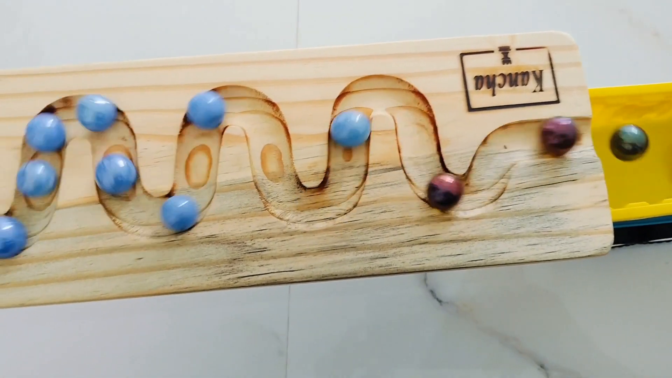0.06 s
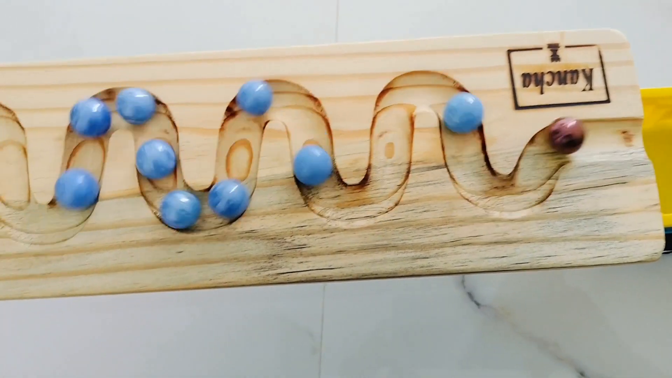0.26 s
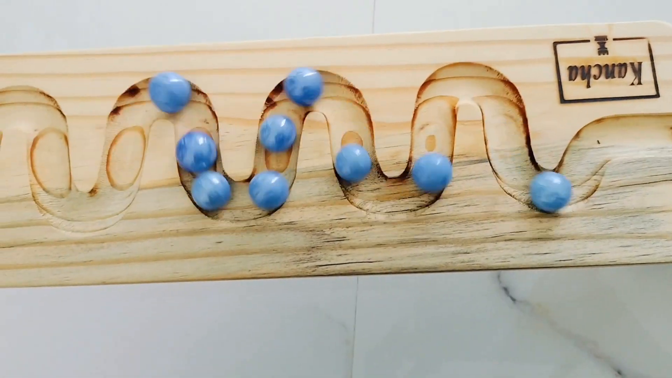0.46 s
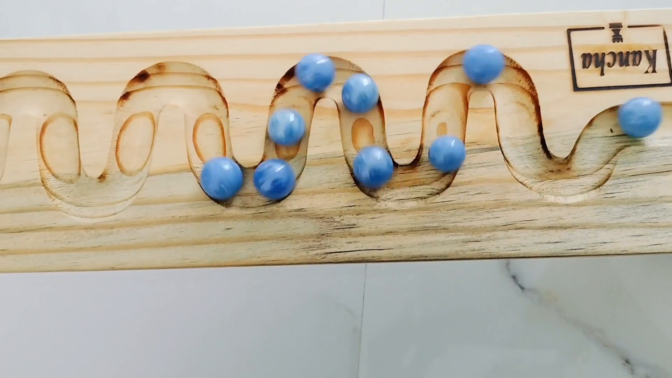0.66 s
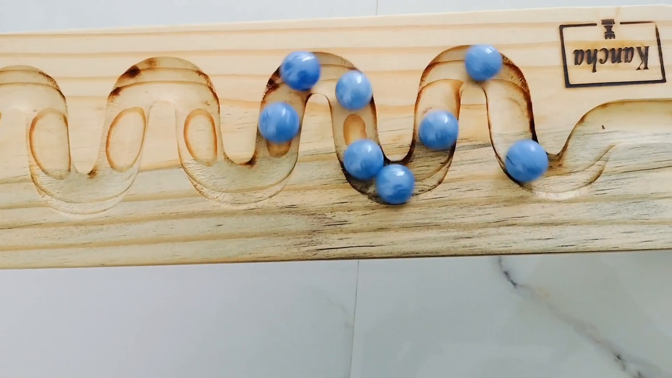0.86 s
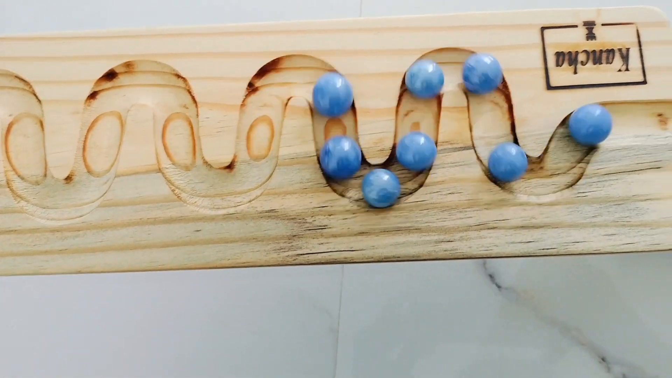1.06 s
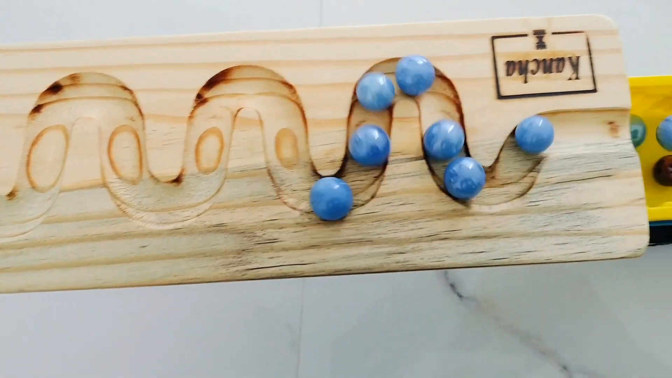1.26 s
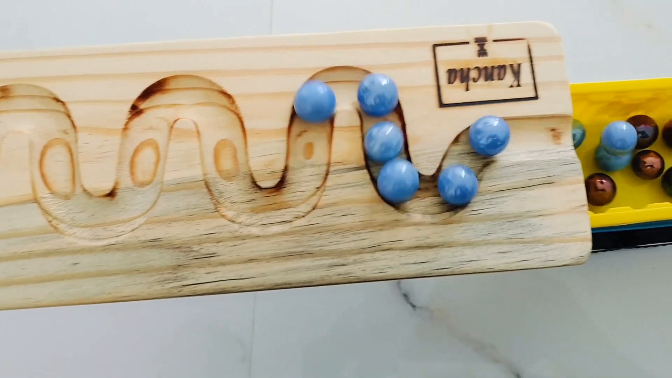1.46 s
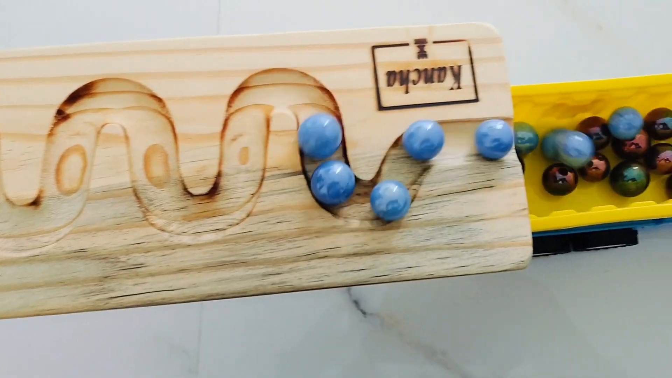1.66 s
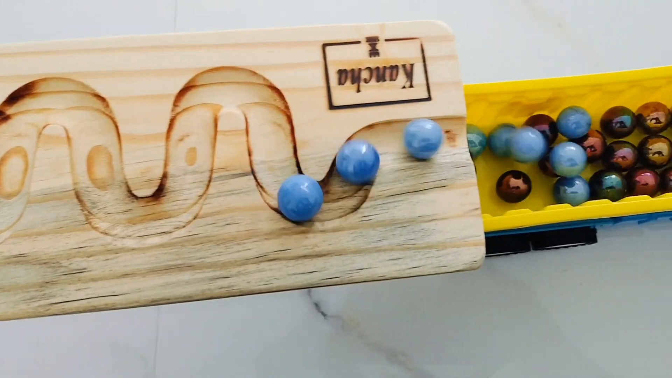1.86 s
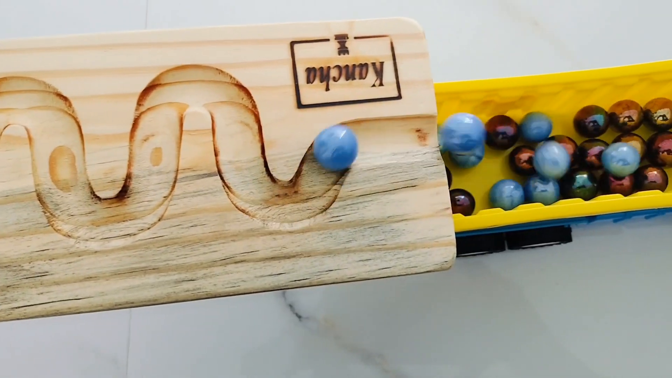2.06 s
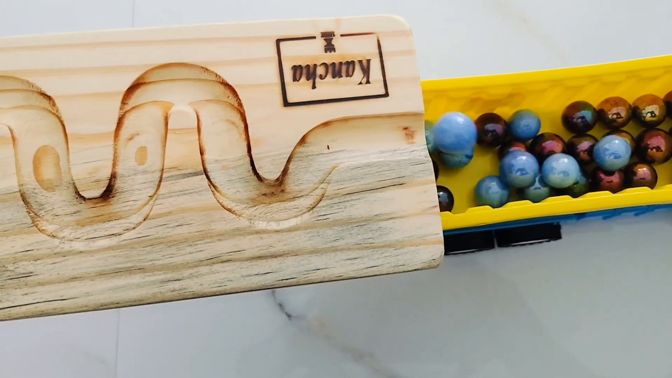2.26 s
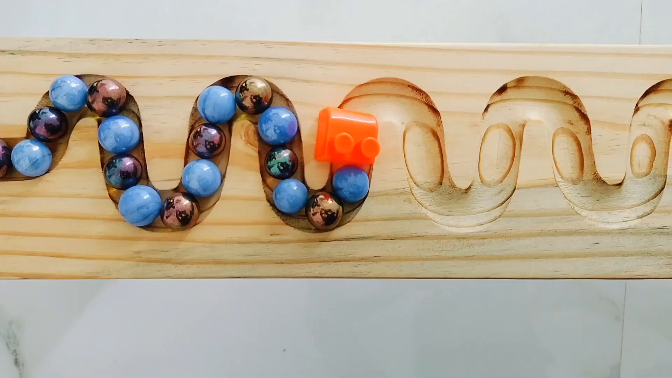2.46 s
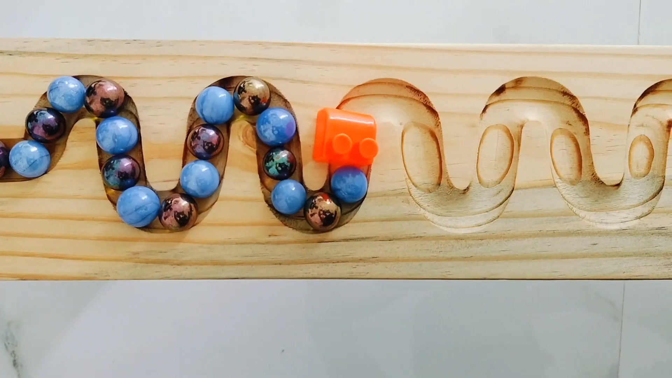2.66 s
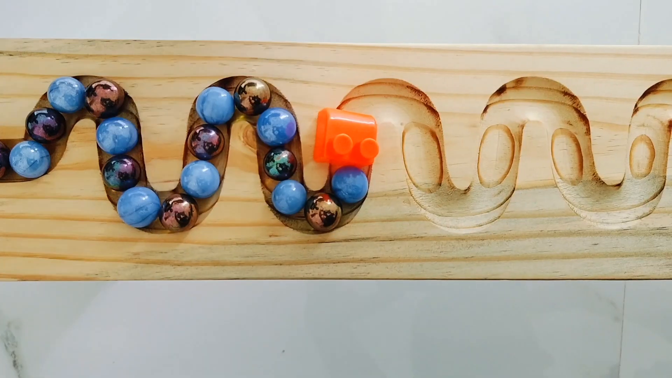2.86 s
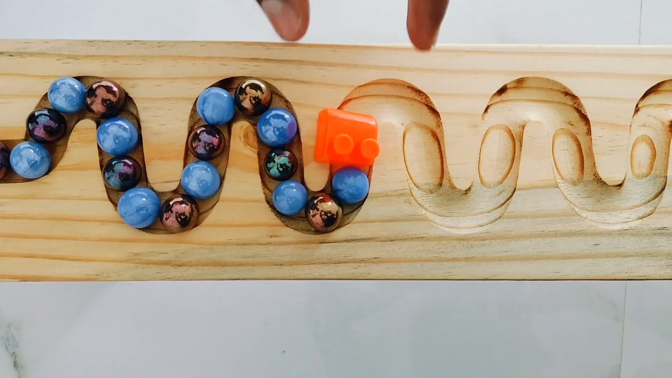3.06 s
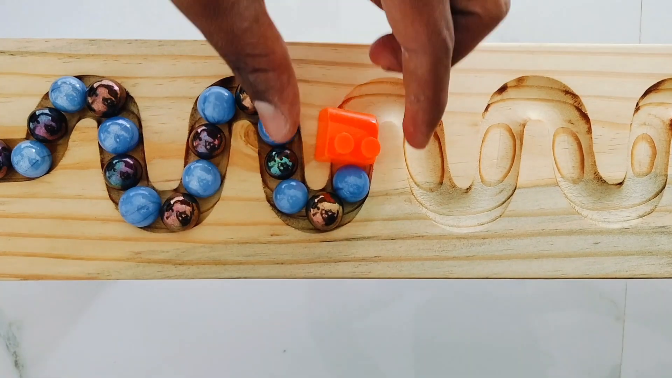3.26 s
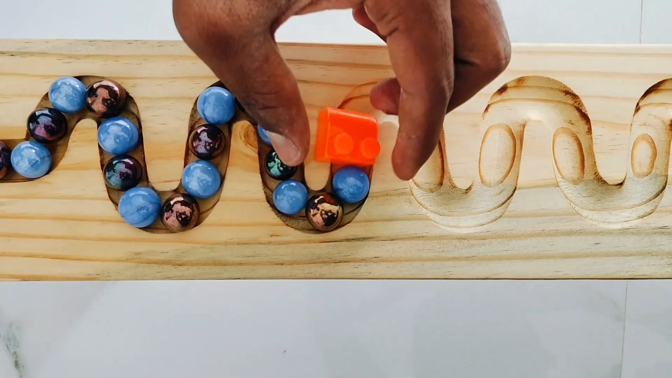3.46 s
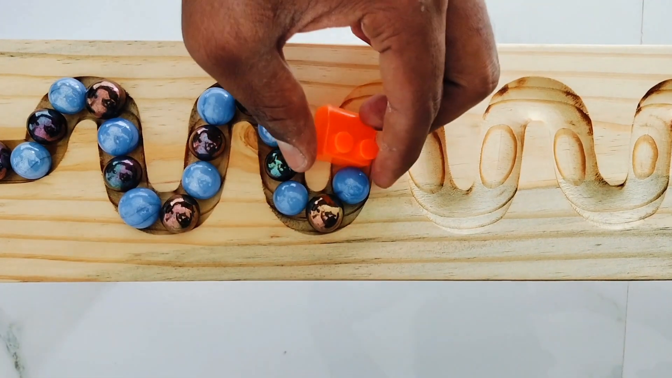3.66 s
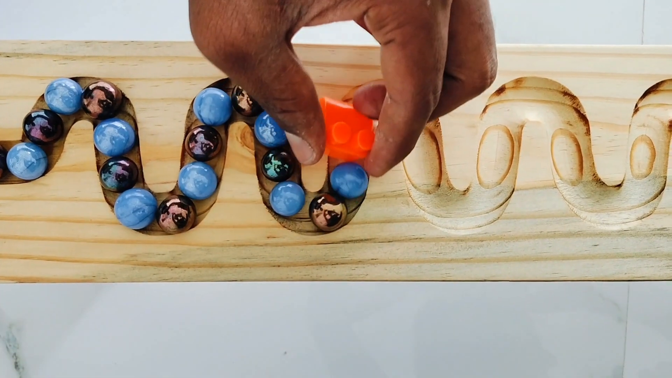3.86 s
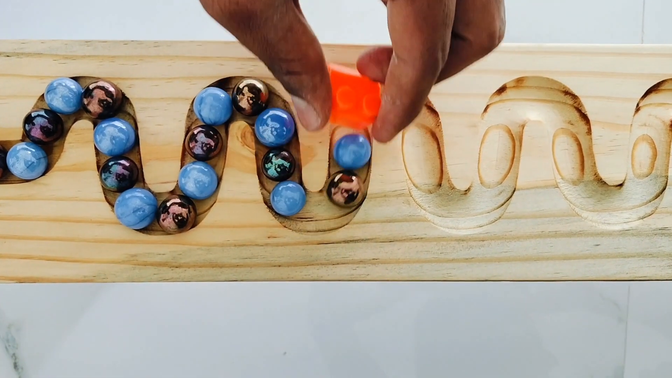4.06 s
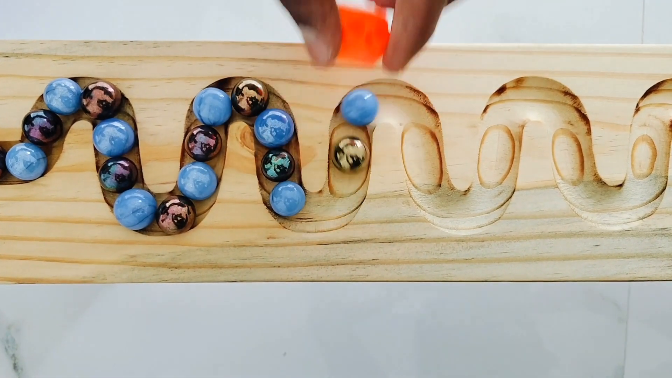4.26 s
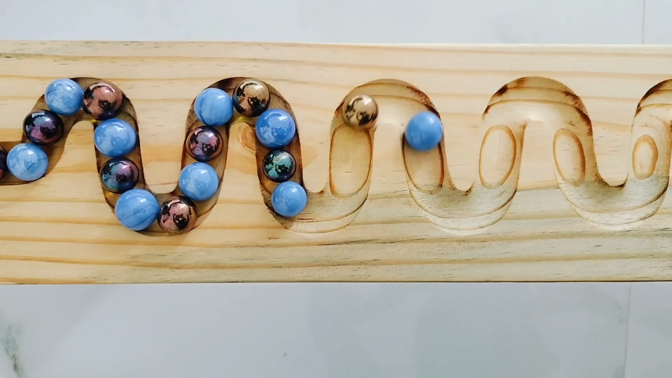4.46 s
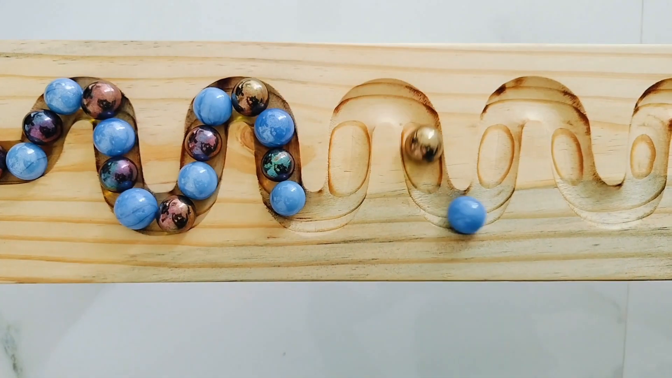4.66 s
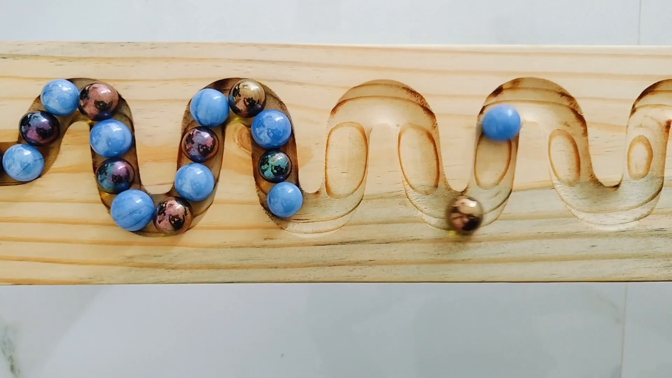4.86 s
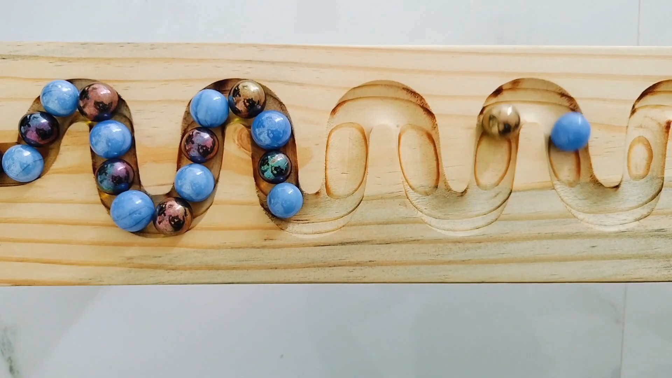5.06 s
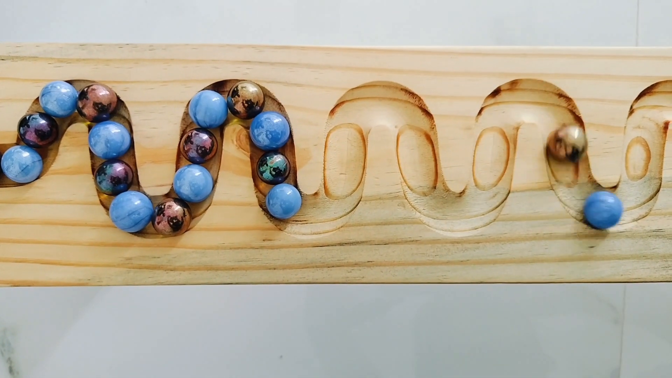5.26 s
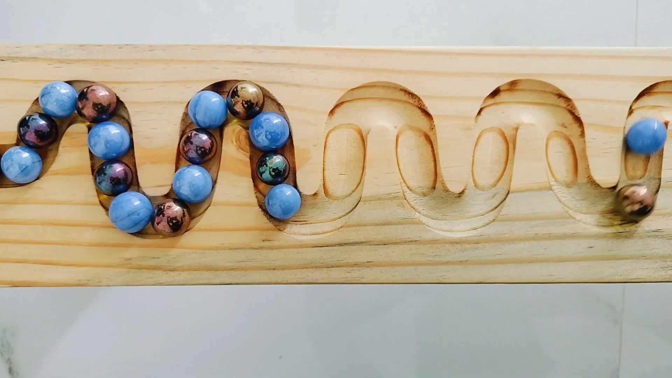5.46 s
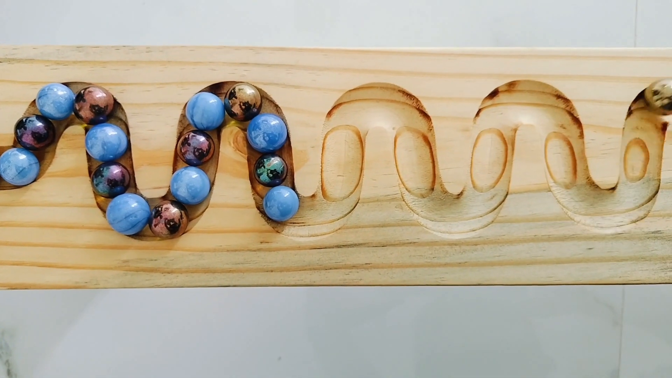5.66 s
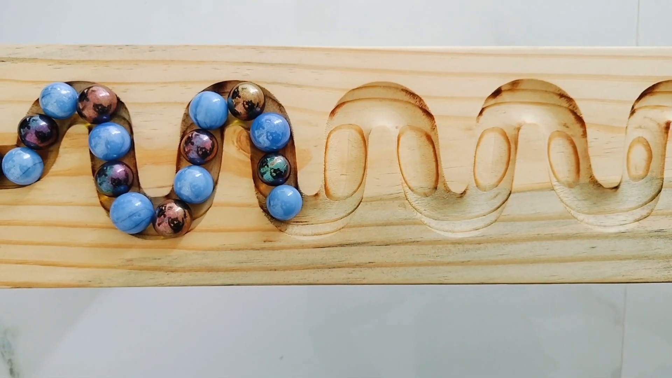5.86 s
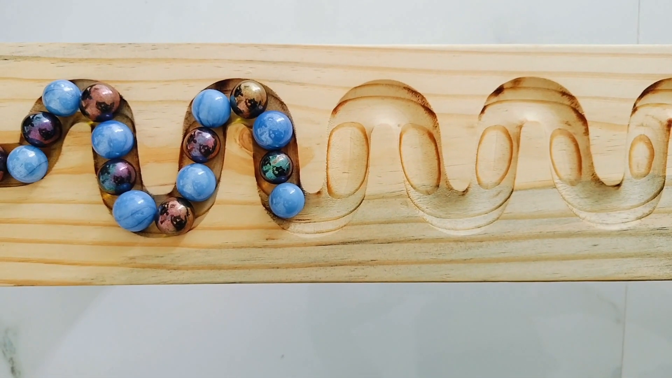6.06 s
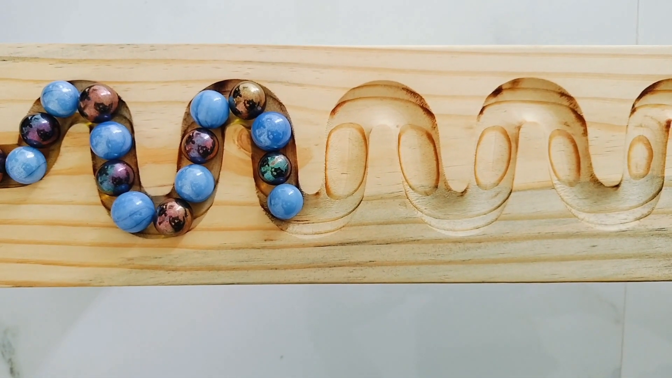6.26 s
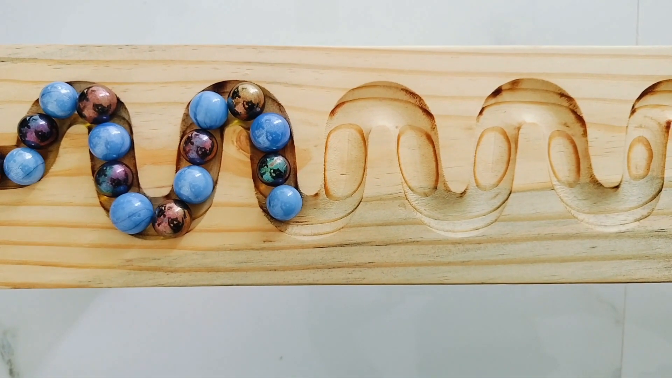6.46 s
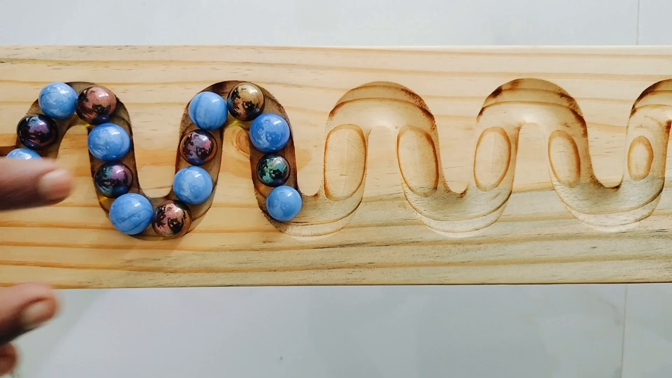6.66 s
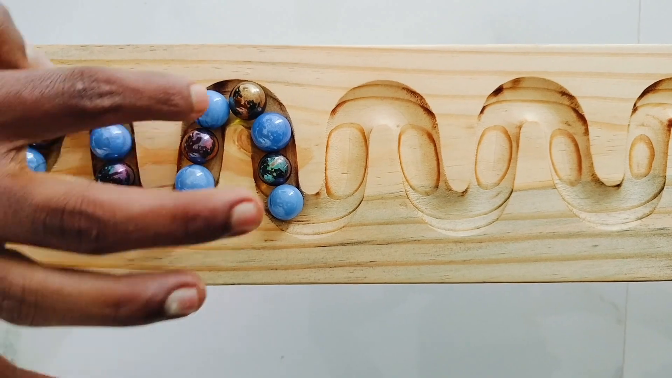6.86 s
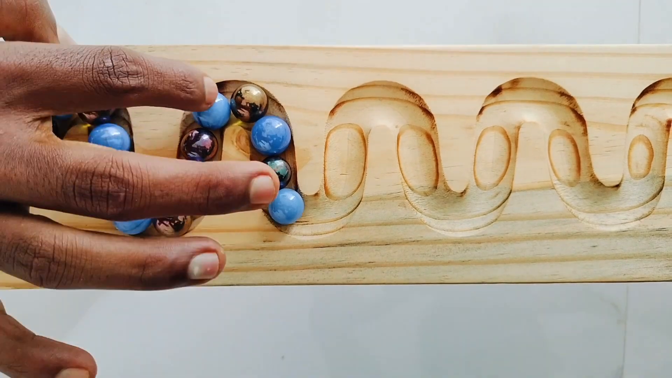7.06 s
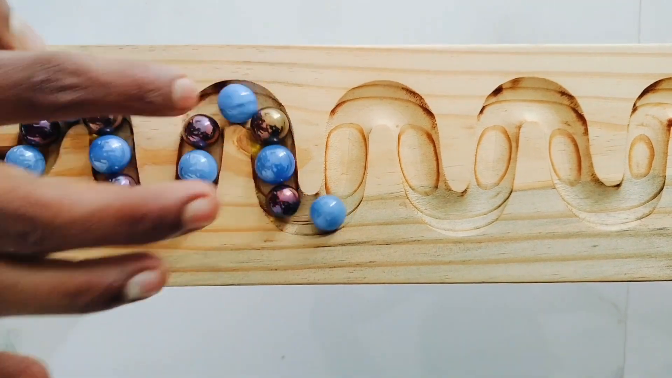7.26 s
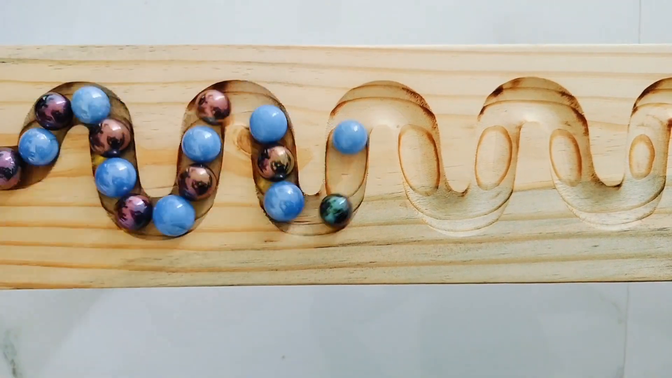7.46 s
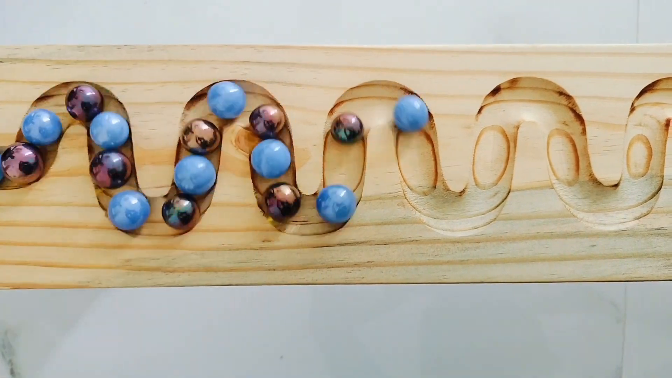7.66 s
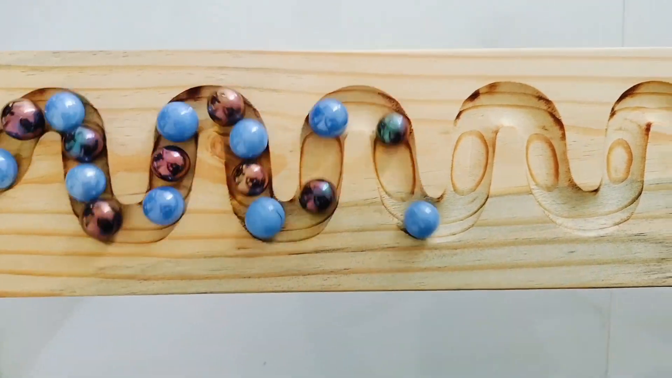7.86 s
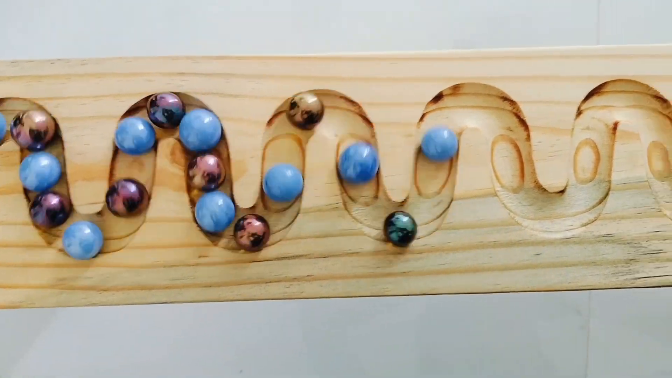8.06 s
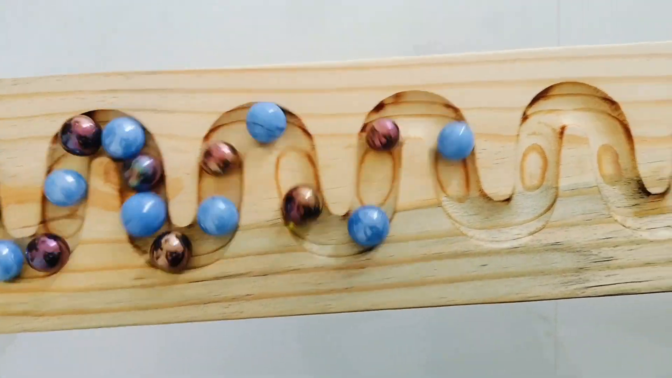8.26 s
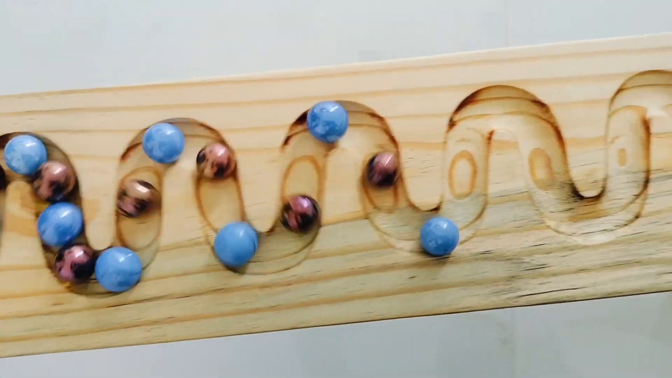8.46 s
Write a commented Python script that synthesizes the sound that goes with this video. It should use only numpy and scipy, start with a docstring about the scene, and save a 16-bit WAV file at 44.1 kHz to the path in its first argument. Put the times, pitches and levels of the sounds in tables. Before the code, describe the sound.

Stereo close microphone indoors: a busy stream of marbles rattles into a plastic tray, pauses briefly, resumes, then stops in dead silence. Quiet low hum and far street noise come back with faint plastic ticks and a short double squeak. Light irregular knocks travel along a wooden board. Suddenly marbles clatter hard in the nearly empty tray, ringing clearer, followed by wooden rolling knocks and small high clinks, with short hard-room reverberation.

```python
"""In a hard tiled room, glass marbles drop into a plastic toy truck bed, knock along a wooden track and clink together.
Blows and random patters excite resonances of plastic, wood and glass; fingers grip a plastic stopper and a rubbing
squeak slips twice. Noise makes a far hiss in swells, an airy rising band, street noise and low room hum.
One wall copy and decaying noise tails give the echoes. The sound is cut to silence for half a second."""
import sys
import numpy as np
from scipy import signal
from scipy.fft import rfft, irfft, next_fast_len
from scipy.io import wavfile
from scipy.ndimage import uniform_filter1d

SR = 44100
rng = np.random.default_rng(int(sys.argv[2]) if len(sys.argv) > 2 else 0)


def to_wav(sig):
    """Store sig (one row per channel, or 1-D mono) as 16-bit WAV at the path in sys.argv[1].

    Samples outside -1..1 are clipped; the rate is SR.
    """
    pcm = np.clip(np.atleast_2d(sig), -1, 1) * 32767
    pcm = np.round(pcm).astype(np.int16)
    wavfile.write(sys.argv[1], SR, pcm.T)  # frames by channels


N = 375291

# marbles landing in the truck bed: start_s, level_db, tilt_db (fall towards high resonances, per octave),
# click_db (glass click, relative)
LANDINGS = [(0.002, -6.5, 0, -18.5), (0.063, -8, 2, -19), (0.1161, -11, 4.5, -12.5),
            (0.1415, -11.5, -13.5, -15), (0.1848, -9.5, 4.5, -17.5), (0.228, -20.5, 3, -15),
            (0.2351, -5, 2.5, -19.5), (0.2565, -11, -7, -14.5), (0.3378, -12.5, 4.5, -15),
            (0.3702, -8, 5.5, -16), (0.407, -10.5, 3, -21), (0.4676, -20, 10.5, -15), (0.5097, -8, -1, -15),
            (0.5361, -12, 8.5, -13), (0.5538, -13.5, -12.5, -16.5), (0.6013, -12, 4, -18.5),
            (0.6281, -20.5, -0.5, -19), (0.86, -35, 1, -14.5), (0.887, -7.5, -1.5, -12.5),
            (0.9452, -13, 0, -15.5), (0.9603, -15.5, -4.5, -15), (1.0058, -19, 11, -8),
            (1.0729, -13, 1, -17.5), (1.0974, -27.5, 3, -19.5), (1.212, -29.5, 6, -24),
            (1.3197, -14.5, -5.5, -8), (1.3258, -10.5, 4, -7), (1.3495, -11.5, -6, -11),
            (1.362, -24.5, 5.5, -21), (1.5158, -10, 1, -11), (1.5432, -18.5, -10.5, -13.5),
            (1.5976, -12.5, -1, -9), (1.6165, -16, -2.5, -18.5), (1.6416, -17.5, 6, -6),
            (1.6764, -23, -4, -10), (1.6949, -9.5, 1, -7.5), (1.7376, -13.5, -6.5, -15.5),
            (1.7773, -14.5, 2, -11), (1.808, -10.5, -3, -8), (1.8303, -10, 3, -13.5),
            (1.868, -20.5, -4, -18.5), (1.8925, -9.5, 5.5, -13), (1.8965, -16.5, 7, -1),
            (1.9122, -15, -7.5, -9.5), (1.936, -14, 7, -9.5), (1.993, -13, -1, -13.5),
            (2.0382, -9.5, 1.5, -5), (2.092, -11.5, 2.5, -9), (2.101, -20, -1, -17), (2.125, -21, 0, -19.5),
            (2.157, -7.5, 3, -8.5), (2.1641, -12.5, -0.5, -10.5), (2.228, -20, -8.5, -8),
            (2.337, -8.5, -2, -12), (2.345, -18, -6, -13), (2.4103, -17.5, 2, -7), (2.435, -22, -7, -11.5),
            (6.9185, -21.5, 7, -18), (6.9252, -4.5, -3.5, -7.5), (6.942, -3.5, 5, -24),
            (7.0403, -2.5, 0.5, -14), (7.056, -12, 7, -15), (7.0773, -8, 0, -14.5),
            (7.099, -13.5, 4.5, -13), (7.1178, -16.5, -5, -12.5), (7.1409, -10, 1, -9.5),
            (7.1597, -17.5, -5, -15), (7.188, -9, 4.5, -10.5), (7.2193, -9, 0.5, -10),
            (7.2403, -27, 3, -14), (7.2493, -20.5, 1.5, 1.5), (7.2602, -14, 6, -6.5),
            (7.281, -25.5, 6.5, -4)]
# broad resonances of the plastic bed: centre_hz, width_hz, level_db
BED_MODES = [(793, 212, -5), (924, 255, -2.5), (1318, 394, -0.5), (1575, 352, -1), (2060, 490, -4),
             (2654, 400, -8.5), (2826, 130, -6), (3630, 880, -9), (4580, 2310, -17.5)]
# the nearly empty bed rings clearer, in fewer and mostly narrower resonances: centre_hz, width_hz, level_db
EMPTY_BED_MODES = [(955, 150, 2.5), (1498, 150, 3.5), (2024, 240, -2.5), (2620, 500, -11.5),
                   (4160, 1300, -17), (5610, 870, -16.5)]
EMPTIED_S = 3
STIR_DB, SETTLE_S = -18.5, 0.23  # jostling relative to each landing's level; time to settle by 60 dB


def truck():
    """Impact excitation of a plate: landings ring the thin plastic bed and set the heap jostling."""
    stir = sum(dying(s, db + STIR_DB, SETTLE_S, attack=0.011) for s, db, *_ in LANDINGS)
    full = np.arange(N) < EMPTIED_S * SR
    out = np.zeros((3, N))
    for modes, when in [(BED_MODES, full), (EMPTY_BED_MODES, ~full)]:
        out += patter(modes, stir * when, rate=220.0, spread_db=5.5, click_db=-15.5, band_hz=(450, 12000))
    for (s, db, tilt_db, click_db), (pan_db, lag_ms) in zip(LANDINGS, placed(LANDINGS)):
        modes = BED_MODES if s < EMPTIED_S else EMPTY_BED_MODES
        blow = strike(modes, tilt_db, 1700, click_db + 2.5, lag_ms,
                      chatter_s=0.026, unlike=0.3, band_hz=(450, 12000))
        add(out, s, amp(db + 15.5) * blow, pan_db)
    return out


# marbles striking the groove walls: start_s, level_db, tilt_db (fall towards high resonances, per octave)
GROOVE_KNOCKS = [(4.6278, -38.5, 7), (4.81, -33, 15), (5.0817, -28.5, -13.5), (5.1262, -30, 0),
                 (5.1353, -29, 8), (5.149, -31, 15), (5.158, -33, -1), (5.1893, -22.5, -4), (5.253, -30, 0),
                 (5.266, -24.5, 3), (5.2834, -21, -8), (5.3486, -26.5, 2), (5.4042, -27, -3.5),
                 (5.4998, -34, 3), (5.558, -31.5, 2.5), (5.6167, -28, 0.5), (5.6312, -28, -1.5),
                 (5.6844, -29.5, -2), (5.713, -32.5, 1), (5.722, -28, 4), (5.7307, -31, 5),
                 (5.7532, -24.5, -2.5), (5.7741, -29.5, 2), (5.8574, -24.5, -2), (5.8816, -28.5, -1),
                 (5.9088, -32.5, 2), (6.0037, -36, 11), (6.027, -30, 3), (6.048, -19.5, -9),
                 (6.1054, -31.5, 19), (6.2117, -24, -16.5), (6.244, -32, 5), (6.2601, -19, -8),
                 (6.2737, -30, -4), (6.3405, -32, 7), (6.352, -30, 8), (6.3717, -25, -10.5),
                 (6.5281, -24, -2.5), (6.5334, -28, 0), (6.5701, -33, 1), (6.6572, -30.5, -0.5),
                 (6.7776, -47, 5), (6.806, -31, -1), (6.8277, -26.5, -5.5), (7.396, -31, -9),
                 (7.5336, -34, -6), (7.6647, -25.5, -7), (7.781, -30, 0.5), (7.8372, -24.5, 5),
                 (7.9031, -24, -2), (7.9555, -32.5, 16), (8.0419, -13.5, -12), (8.122, -24, 3),
                 (8.1636, -26.5, -17), (8.2077, -15, -15), (8.2672, -18, -5), (8.281, -15, -6.5),
                 (8.3196, -44, 12), (8.3451, -33, 2), (8.3838, -26, -18), (8.4011, -23, 2),
                 (8.4323, -21.5, -1), (8.473, -26.5, -2)]
# marbles rolling over the grain, two level curves: time_s, level_db
ROLLING_LEVELS = [
    [(0, -49.5), (1, -55.5), (1.8, -46.5), (2.3, -49.5), (2.55, -62)],
    [(4.2, -60), (4.6, -68), (5.1, -52), (5.43, -56.5), (5.8, -56.5), (6.65, -58), (6.9, -56), (7.05, -39),
     (7.46, -54), (7.7, -55.5), (8.05, -43.5), (8.51, -42)],
]
# resonances of the wooden board: centre_hz, width_hz, level_db
BOARD_MODES = [(233, 140, -8.5), (435, 57, -3), (667, 95, 0), (961, 220, 0), (1231, 100, 1.5),
               (1556, 99, -1), (1946, 110, -4), (2360, 98, -3.5), (3370, 170, -19), (4250, 220, -23)]


def track():
    """Forced vibration of a board: marbles knock the groove at each bend and tick over the grain."""
    out = patter(BOARD_MODES, level(*ROLLING_LEVELS), rate=150.0, spread_db=7.5, click_db=-43, band_hz=(60, 2000))
    for (s, db, tilt_db), (pan_db, lag_ms) in zip(GROOVE_KNOCKS, placed(GROOVE_KNOCKS)):
        blow = strike(BOARD_MODES, tilt_db, 1300, -62, lag_ms, chatter_s=0.0021, unlike=0.58, band_hz=(90, 3000))
        add(out, s, amp(db + 13.0) * blow, pan_db)
    return out


# glass on glass: start_s, level_db, centre_hz
GLASS_CLINKS = [(0.819, -41, 9000), (0.835, -40.5, 9040), (7.4375, -35.5, 8630), (7.4569, -34, 7970),
                (7.5113, -34.5, 9350), (7.5333, -21.5, 6840), (7.7375, -34.5, 9280), (7.7446, -24.5, 7450),
                (7.8338, -24.5, 8910), (7.891, -35.5, 9530), (7.9458, -36.5, 7470), (7.9646, -25, 8420),
                (7.9754, -30, 8530), (7.9887, -36.5, 8340), (8.004, -25, 8320), (8.0216, -36.5, 8200),
                (8.049, -27, 5696), (8.1112, -24.5, 8000), (8.2425, -33, 6360), (8.2837, -25, 6640),
                (8.291, -19, 8590), (8.3468, -30, 7290), (8.4531, -33, 8400), (8.4966, -25.5, 8560)]


def clinks():
    """Elastic collision: small solid spheres hardly ring, giving a brief burst in one broad treble resonance."""
    out = np.zeros((3, N))
    t, f = np.arange(512) / SR, np.fft.rfftfreq(512, 1 / SR)
    for (s, db, hz), (pan_db, _) in zip(GLASS_CLINKS, placed(GLASS_CLINKS)):
        burst = rng.standard_normal((3, 512)) * amp(-60 * t / 0.022) + 2.2 * (t == 0)
        burst = irfft(rfft(burst) * resonant([(hz, 3500, 0)], f) * passband(f, 2000, 8300))
        burst = burst / np.linalg.norm(burst, axis=1, keepdims=True)
        add(out, s, amp(db + 9.0) * burst, pan_db)
    return out


# fingers gripping the plastic stopper: start_s, level_db
GRIPS = [(3.816, -40.5), (3.835, -39), (3.845, -53), (3.998, -57.5)]
# resonances of the stopper: centre_hz, width_hz, level_db
STOPPER_MODES = [(2690, 340, 8), (3530, 640, -0.5), (6200, 2000, -35), (9400, 3600, -26.5)]


def stopper():
    """Impact excitation of a small solid: finger contacts ring the plastic stopper."""
    out = np.zeros((3, N))
    for s, db in GRIPS:
        blow = strike(STOPPER_MODES, 0, 3000, -36, 0, chatter_s=0.023, unlike=.6, band_hz=(900, 9000))
        add(out, s, amp(db + 14.0) * blow, 0)
    return out


# two slips: start_s, pitch_hz (at the start), level_db, t60_s, scratch_db (relative)
SLIPS = [(4.883, 1995, -24.5, 0.065, 4), (4.955, 2213, -26, 0.11, -3.5)]
# partials of a slip: multiple, level_db
SLIP_PARTIALS = [(1, -2), (2, 2.5), (3, -18)]
# spectrum of the scratch: frequency_hz, level_db (per Hz)
SCRATCH_COLOUR = [(1200, -15), (1800, -5.5), (2800, -5.5), (4000, -6.5), (8000, -28), (16000, -30)]
SLIP_ATTACK_S, SLIP_RISE_HZ_PER_S = 0.0055, 300


def squeak():
    """Frictional excitation: each rubbing slip is a scratch and a rising tone with a strong octave."""
    out, t = np.zeros((3, N)), np.arange(N) / SR
    for s, hz, db, t60, scratch_db in SLIPS:
        wobble_hz = 500 * uniform_filter1d(rng.standard_normal(N), 120)
        turns = np.cumsum(hz + SLIP_RISE_HZ_PER_S * (t - s) + wobble_hz) / SR
        tone = sum(amp(g) * np.sin(2 * np.pi * (k * turns + rng.random((3, 1)))) for k, g in SLIP_PARTIALS)
        scratch = unit(filtered(rng.standard_normal((3, N)), lambda f: amp(along(SCRATCH_COLOUR, f))))
        out += dying(s, db, t60, SLIP_ATTACK_S) * (tone + amp(scratch_db) * scratch)
    return out


# click of a glass marble: centre_hz, width_hz, level_db
GLASS_MODES = [(7740, 18000, 0)]


def strike(modes, tilt_db, split_hz, click_db, lag_ms, chatter_s, unlike, band_hz):
    """Modal excitation: a sharp contact and chatter drive a ring of energy 1, each resonance at a new strength."""
    t, f = np.arange(2048) / SR, np.fft.rfftfreq(2048, 1 / SR)
    noise = rng.standard_normal((3, 2048)) * amp(-60 * t / chatter_s)
    push = noise[0] + unlike * noise[1:] + 1.22 * (t == 0)
    # summed over all directions the chatter evens out: the room receives one smooth push
    push = np.vstack([push, t == 0])
    # octaves below the split, held within one either way
    side = np.clip(np.log2(split_hz / np.transpose(modes)[0][:, None]), -1, 1)
    tweak_db = tilt_db * side + 1.66 * rng.standard_normal((len(modes), 1))
    body = resonant(modes, f, tweak_db) * passband(f, *band_hz)
    # the sound reaches one microphone port a little before the other
    half_lag = np.clip(lag_ms, -.5, .5) / 2
    delay_ms = np.array([[.4 + half_lag], [.4 - half_lag], [.4]])
    late = rfft(push) * np.exp(-2j * np.pi * f * delay_ms / 1000)
    ring, click = irfft(late * body), irfft(late * resonant(GLASS_MODES, f))
    size = lambda x: np.linalg.norm(x, axis=1, keepdims=True)
    return ring / size(ring) + amp(click_db) * click / size(click)


def patter(modes, gain, rate, spread_db, click_db, band_hz):
    """Random impulse process: many small contacts, rate per second, excite resonances under a level curve."""
    contacts = rng.random((3, N)) < rate / SR
    dust = contacts * amp(spread_db * rng.standard_normal((3, N)))
    # each contact recurs 7 samples later with the row order reversed
    dust = dust + 1.39 * np.roll(dust[::-1], 7, axis=1)
    body = unit(filtered(dust, lambda f: resonant(modes, f) * passband(f, *band_hz)))
    click = unit(filtered(dust, lambda f: resonant(GLASS_MODES, f)))
    return gain * (body + amp(click_db) * click)


# bearing of the marbles: time_s, left_lag_ms
MARBLE_BEARING = [(0, .15), (2.6, 0.048), (4.2, -0.19), (6, .1), (6.9, .36), (7.4, 0.4), (7.6, -0.16),
                  (8.5, -0.29)]
# the side that the sound reaches later is also softer; blows scatter around the bearing
SOFTER_DB_PER_MS, SCATTER_MS, SCATTER_DB = 5.5, 0.068, 1.5


def placed(rows):
    """Interaural differences: left-right dB and left lag ms for each blow, from the bearing of the marbles."""
    chance = rng.standard_normal((len(rows), 2))
    lag_ms = np.interp([row[0] for row in rows], *np.transpose(MARBLE_BEARING))
    pan_db = -SOFTER_DB_PER_MS * lag_ms + SCATTER_DB * chance[:, 0]
    return np.transpose([pan_db, lag_ms + SCATTER_MS * chance[:, 1]])


def resonant(modes, f, tweak_db=0):
    """Modal superposition: a causal sum of resonances with alternating signs."""
    c, w, db = np.transpose(modes)[:, :, None]
    sign = (-1.0) ** np.arange(len(modes))[:, None]
    return np.sum(sign * amp(db + tweak_db) * 1j * f * w / (c * c - f * f + 1j * f * w), axis=0)


def passband(f, lo_hz, hi_hz):
    """Radiation and contact limits: a small body radiates little bass; a soft contact makes little treble."""
    return (1j * f / (lo_hz + 1j * f)) ** 4 / (1 + 1j * f / hi_hz) ** 2


# reverberation time: frequency_hz, t60_s
ROOM_DECAY = [(300, 0.76), (1000, 0.46), (3000, 0.58), (8000, 0.39), (15000, 0.22)]
# echoes come mostly from the side of the marbles: frequency_hz, left_right_likeness
ECHO_LIKENESS = [(300, 1), (1000, 0.41), (2000, 0.097), (4000, 0.078)]


def room(x, gap_s=.011):
    """Reverberation: walls answer after a gap; the marbles move, so each quarter second has its own noise tail."""
    out, size = np.zeros((2, N + 2 * SR)), SR // 4
    for start in range(0, N, size):
        hz, t, z = signal.stft(rng.standard_normal((2, SR * 3 // 4)), SR, nperseg=256)
        decay = amp(-60 * t / along(ROOM_DECAY, hz)[:, None])
        tail = signal.istft(z * decay, SR, nperseg=256)[1]
        tail = paired(tail, [(20, 0), (20000, 0)], ECHO_LIKENESS) / np.sqrt(tail.shape[1])
        lag_s = np.interp((start + size / 2) / SR, *np.transpose(MARBLE_BEARING)) / 1000
        turn = lambda f: np.exp(-1j * np.pi * f * lag_s * np.array([[1], [-1]]))
        tail = filtered(np.pad(tail, ((0, 0), (32, 0))), turn)
        echo = signal.fftconvolve(x[None, start:start + size], tail, axes=1)
        add(out, start / SR + gap_s, echo, -.8)
    return out[:, :N]


# swells of the far hiss: centre_s, level_db
HISS_SWELLS = [(4.43, -65.5), (4.927, -61), (5.472, -60), (5.993, -63), (6.443, -64.5)]
# spectrum of the hiss: frequency_hz, level_db (per Hz)
HISS_SPECTRUM = [(2000, -40), (3500, 7.5), (5800, 7), (8000, 1.5), (10000, -1), (15500, -15.5)]
SWELL_S = 0.069  # half length of a swell


def hiss():
    """Amplitude modulation: treble noise swells and fades far off."""
    swell = sum(bell(s, db, SWELL_S) for s, db in HISS_SWELLS)
    return swell * paired(rng.standard_normal((2, N)), HISS_SPECTRUM)


# airy rising band: start_s, level_db
AIRY_BANDS = [(3.37, -59), (4.04, -59.5)]
GLIDE_HZ, GLIDE_UP_HZ = 4500, 750  # centre at the start, total rise
GLIDE_S, FADE_S = .05, 0.47  # time constant of the rise, time to fall 60 dB


def whistle():
    """Frequency translation: slow noise multiplies a sine, a narrow band that glides upward and levels off."""
    out, t = np.zeros((2, N)), np.arange(N) / SR
    for s, db in AIRY_BANDS:
        blur = unit(uniform_filter1d(rng.standard_normal((2, N)), 90))
        hz = GLIDE_HZ + GLIDE_UP_HZ * (1 - np.exp(-np.maximum(t - s, 0) / GLIDE_S))
        carrier = np.sin(2 * np.pi * np.cumsum(hz) / SR)
        out += dying(s, db, FADE_S, attack=0.033) * blur * carrier
    return out


# far street noise: time_s, level_db
STREET_LEVEL = [(0, -42.5), (2.62, -71), (3.18, -61), (4.2, -62.5), (8.51, -53.5)]
# its spectrum: frequency_hz, level_db (per Hz)
STREET_SPECTRUM = [(190, -33.5), (330, -15.5), (400, -6.5), (833, -14.5), (1010, -8.5), (1090, -11),
                   (1550, -11.5), (3240, -28), (4980, -25), (6040, -30), (15000, -56)]


def street():
    """Spectral shaping: broadband noise is coloured as far street noise."""
    return level(STREET_LEVEL) * paired(rng.standard_normal((2, N)), STREET_SPECTRUM)


# low room hum: time_s, level_db
HUM_LEVEL = [(0, -56.5), (2.62, -63.5), (3.18, -60), (5.2, -53.5), (6.5, -58.5), (7.2, -52.5),
             (8.51, -55.5)]
# its spectrum: frequency_hz, level_db (per Hz)
HUM_SPECTRUM = [(12, -26.5), (20, 11.5), (43, -1.5), (75, -2), (91, -16.5), (108, 0), (161, -4.5),
                (204, -17), (238, -4), (308, -13), (330, -21), (430, -48.5), (730, -120)]


def hum():
    """Spectral shaping: noise weighted to the bass makes the low room hum."""
    return level(HUM_LEVEL) * paired(rng.standard_normal((2, N)), HUM_SPECTRUM)


# narrow bands of a motor beyond the wall: centre_hz, width_hz, level_db (relative)
MOTOR_BANDS = [(59.2, 5, -61), (81, 7, -58), (160, 9, -63), (237, 10, -68)]
# gain over all the bands: time_s, level_db
MOTOR_LEVEL = [(0, -7), (2.62, -14), (3.18, -1), (8.51, -5.5)]


def motor():
    """Narrow-band resonance: noise through sharp low resonances makes the motor beyond the wall."""
    out = np.zeros(N)
    for hz, width_hz, db in MOTOR_BANDS:
        band = filtered(rng.standard_normal(N), lambda f: resonant([(hz, width_hz, 0)], f))
        out += amp(db) * unit(band)
    return out * level(MOTOR_LEVEL)


def background():
    """Superposition: the sum of the far and low sounds."""
    return hum() + motor() + street() + hiss() + whistle()


# background noise: frequency_hz, left_right_likeness
NOISE_LIKENESS = [(60, 0.76), (290, 0.85), (640, 0.59), (1400, 0), (3000, 0)]


def paired(pair, spectrum, alike=NOISE_LIKENESS):
    """Interchannel coherence: two unrelated noises become left and right with a likeness set by frequency."""
    turn = lambda hz: np.arccos(np.clip(along(alike, hz), -1, 1)) / 2
    response = lambda hz: amp(along(spectrum, hz)) * [np.cos(turn(hz)), np.sin(turn(hz))]
    mid, side = filtered(pair, response)
    return unit(np.array([mid + side, mid - side]))


def amp(db):
    """Decibel law: amplitude ratio of a level."""
    return 10 ** (np.asarray(db) / 20)


def unit(x):
    """Root-mean-square normalisation to 1."""
    return x / np.sqrt(np.mean(x ** 2) + 1e-20)


def along(points, hz):
    """Logarithmic interpolation: (Hz, value) points on a log frequency axis."""
    f, v = np.transpose(points)
    return np.interp(np.log(hz + 1), np.log(f + 1), v)


def level(*tables):
    """Envelope: summed gain per sample from (s, dB) tables, practically zero outside them."""
    t = np.arange(N) / SR
    return sum(amp(np.interp(t, *np.transpose(rows), left=-200, right=-200)) for rows in tables)


def dying(s, db, t60, attack):
    """Exponential decay: gain that rises at s and falls 60 dB in t60."""
    t = np.maximum(np.arange(N) / SR - s, 0)
    return amp(db - 60 * t / t60) * (1 - np.exp(-t / attack))


def bell(s, db, half):
    """Gaussian envelope: gain that swells and fades around s."""
    return amp(db) * np.exp(-((np.arange(N) / SR - s) / half) ** 2 / 2)


def filtered(x, response):
    """Linear filtering: the spectrum of x times a response of frequency."""
    m = next_fast_len(x.shape[-1] + 8192)
    return irfft(rfft(x, m) * response(np.fft.rfftfreq(m, 1 / SR)), m)[..., :x.shape[-1]]


def add(out, s, sound, pan_db):
    """Superposition: rows are left, right and, if there is one, what goes out into the room."""
    start = round(s * SR)
    part = out[:, start:start + sound.shape[1]]
    gain = amp([[pan_db / 2], [-pan_db / 2], [0]])[:len(out)]
    part += sound[:, :part.shape[1]] * gain


def scene():
    """Direct sound, early reflection and reverberation of the near sources, over the background."""
    bed, board, glass, rub = truck(), track() + stopper(), clinks(), squeak()
    near = (bed + board + glass + rub)[:2]
    # the nearest wall returns one clear copy, sides crossed
    wall = amp(-14.5) * np.roll(near[::-1], round(0.0093 * SR), axis=1)
    to_room = amp(-5.0) * bed[2] + amp(-6.5) * board[2] + amp(-5.5) * glass[2] + amp(-3) * rub[2]
    return near + wall + room(to_room) + background()


# the microphone dulls the top: frequency_hz, gain_db
MIC_RESPONSE = [(9000, 1.5), (12000, -0.5), (15900, -6.5)]
# the silent gap: start_s, end_s
SILENT_GAP = (2.6165, 3.183)
TOP_HZ = 15900


def record(dry):
    """Gating and band limiting: a silent gap with brief ramps, a duller top and nothing kept above the limit."""
    t = np.arange(N) / SR
    sounding = (t < SILENT_GAP[0]) | (t > SILENT_GAP[1])
    kept = uniform_filter1d(1.0 * sounding, 60)
    return filtered(np.clip(dry * kept, -1, 1), lambda hz: amp(along(MIC_RESPONSE, hz)) * (hz < TOP_HZ))


dry = scene()
out = record(dry)
to_wav(out)
```